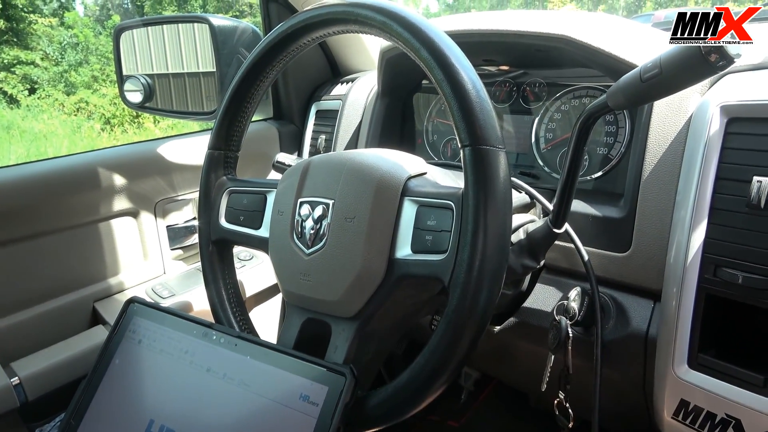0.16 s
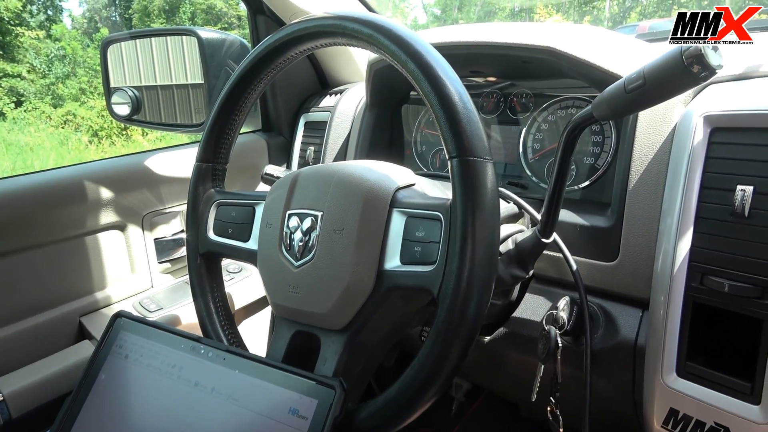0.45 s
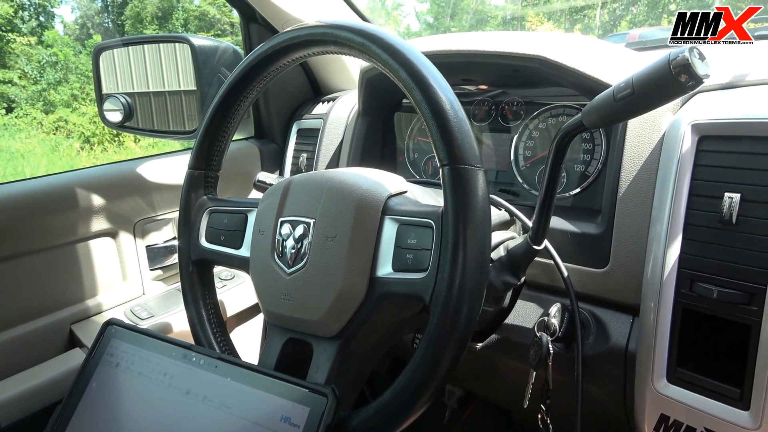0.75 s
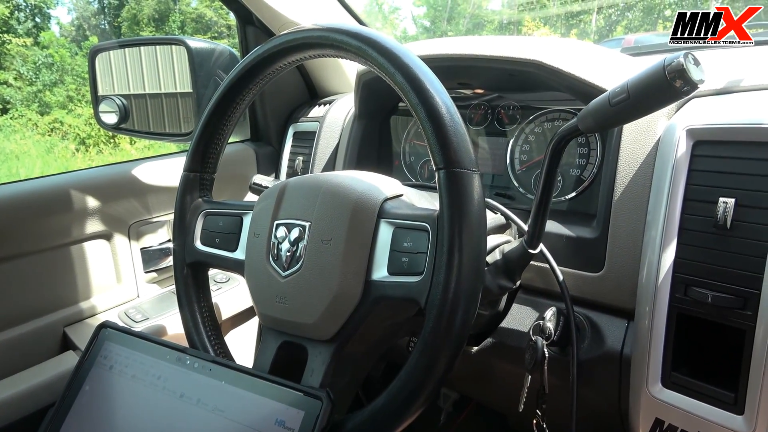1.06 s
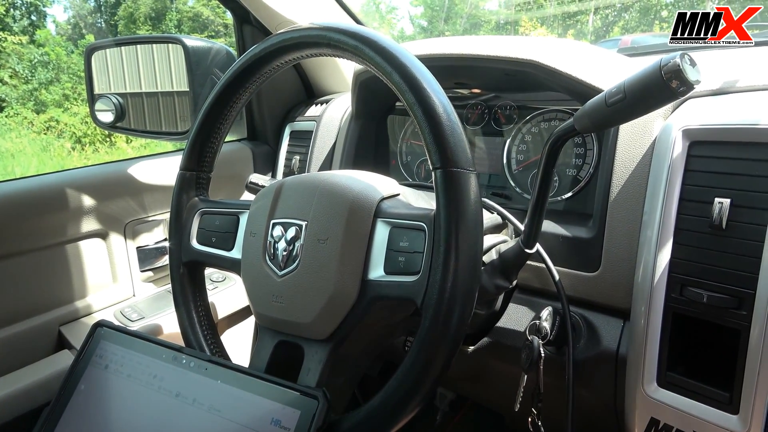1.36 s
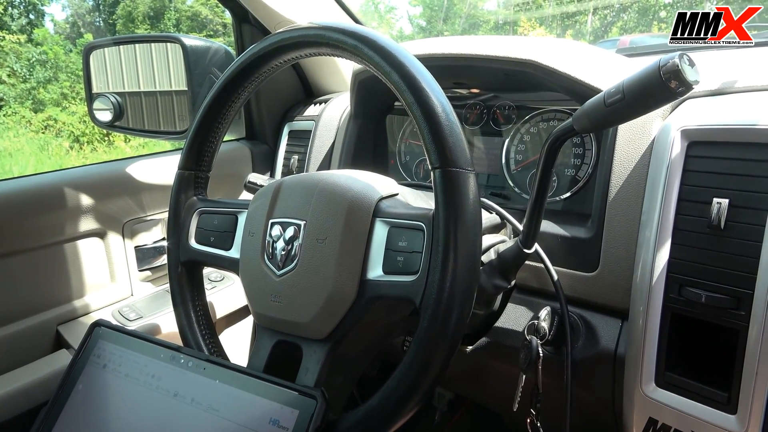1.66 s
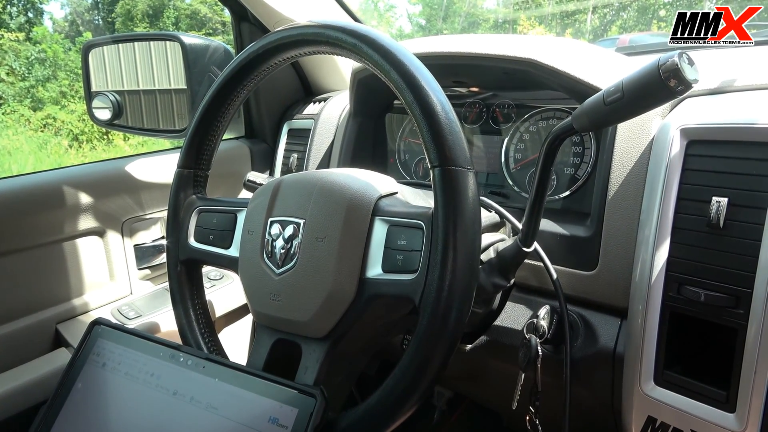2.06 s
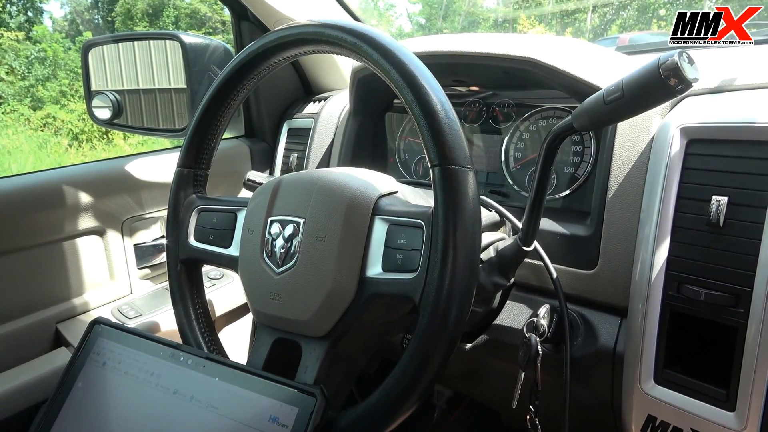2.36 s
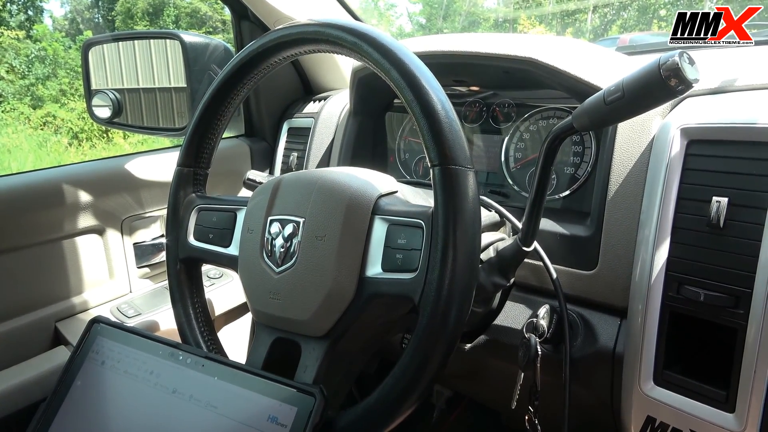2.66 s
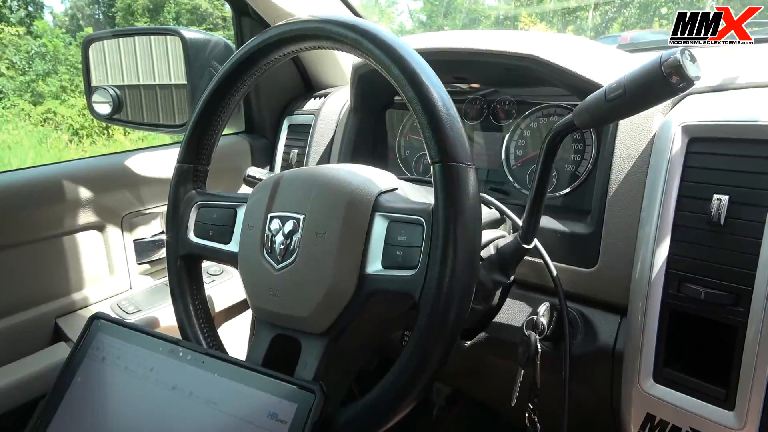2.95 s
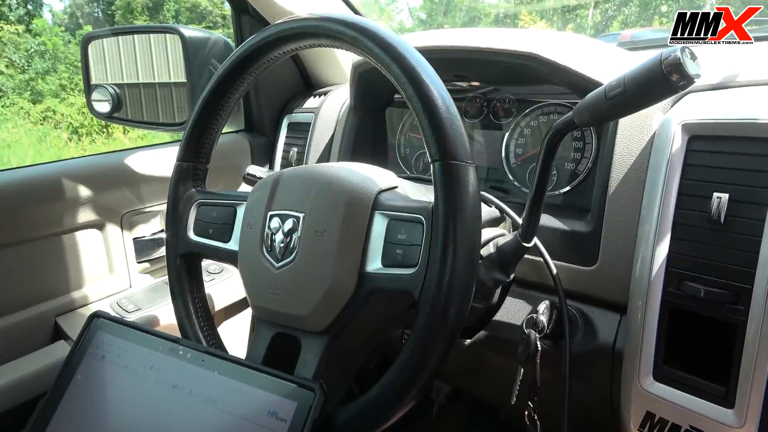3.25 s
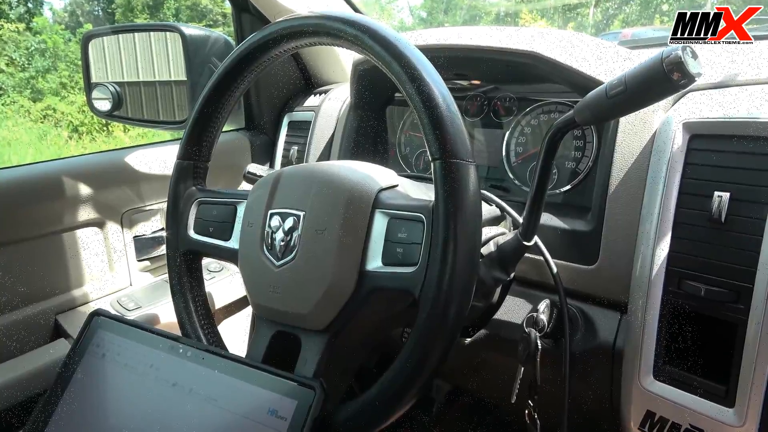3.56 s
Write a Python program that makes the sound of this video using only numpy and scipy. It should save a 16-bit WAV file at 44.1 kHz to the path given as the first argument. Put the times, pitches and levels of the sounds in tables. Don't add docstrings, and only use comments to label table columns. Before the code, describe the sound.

A large petrol engine idles fast and lumpy, booming and clattering inside a vehicle cabin.

```python
import sys
import numpy as np
from scipy import signal
from scipy.io import wavfile
from scipy.ndimage import uniform_filter1d

SR = 44100
rng = np.random.default_rng(int(sys.argv[2]) if len(sys.argv) > 2 else 0)


def elevation(decibels):
    levels = np.asarray(decibels, float)
    return 10 ** (levels / 20)


def store_pcm(level_fs):
    pcm = np.round(np.clip(level_fs, -1, 1) * 32767).astype(np.int16)
    wavfile.write(sys.argv[1], SR, np.atleast_2d(pcm).T)


N = 163170

# time_s, speed_rpm
CRANK_SPEED = [(0.0, 1144.7), (0.3, 1150.6), (0.55, 1123.2), (0.8, 1117.8), (1.3, 1118.2), (1.9, 1114.2),
               (2.3, 1106.6), (2.8, 1104.8), (3.2, 1094.5), (3.7, 1069.7)]
# multiple_of_cycle_rate, then rms level cold_db, easing_db, settling_db, warm_db
FIRING_ORDERS = [(1, -40, -41, -42, -38), (1.5, -38, -36, -35, -37), (2, -25, -26, -26.5, -32),
                 (3, -27, -25, -23.5, -22), (4.5, -43, -41, -40, -39), (5, -15, -14.5, -14.7, -16.5),
                 (7, -32, -29, -27, -21.5), (8, -16, -20.5, -25, -18), (8.5, -38, -37, -36, -38),
                 (9, -38, -34, -31.5, -29.5), (10, -46, -41, -36, -33), (11, -45, -44, -43, -42),
                 (14, -38, -42, -52, -55), (15, -43, -46, -48, -39), (16, -19, -24, -23.3, -21),
                 (17, -37, -34, -32.5, -30.5), (18, -45, -48, -43, -35), (22, -52, -49, -46, -47),
                 (29, -48, -47, -46, -46)]
# pitch_hz, sharpness_q
CABIN_BOOMS = [(29.3, 12), (77.2, 4.1)]
# up_to_hz, first_place_cycles, first_swell_db, second_place_cycles, second_swell_db
KNOCK_PLACES = [
    (400, .08, 5, .7, 4),
    (700, .12, 8, .55, 3),
    (820, .12, 5, .95, 3),
    (1050, .54, 3, .8, 3),
    (1200, .58, 7, .93, 6),
    (3200, .58, 4.5, .21, 2.5),
    (20000, .8, 3, .1, 1.5),
]
# time_s, level_db
ENGINE_LOAD = [(0.03, -32.5), (0.75, -33), (1.19, -32), (1.55, -31), (2.62, -30.5), (3.7, -29.5)]
# pitch_hz, density_db_per_hz
RUMBLE_COLOUR = [(4, -20), (9, -5), (25, -1), (62, -1), (85, -5), (112, -11), (170, -14), (200, -23),
                 (300, -40)]
ROAR_COLOUR = [(150, -38), (210, 1), (350, 1.5), (520, -6), (690, -10), (800, -3.5), (1050, -8.5),
               (1400, -15), (1700, -16)]
CLATTER_COLOUR = [(1200, -10), (1450, -8.5), (1800, 0.5), (2300, -2.5), (2950, -1.5), (3200, -4),
                  (4100, -7.5), (4600, -19)]
HISS_COLOUR = [(3900, -11.5), (4500, -2), (5600, -1), (6600, -4.5), (9000, -6.5), (10500, -11.5),
               (12500, -15), (15600, -27.5), (16500, -40)]
# pitch_hz, width_hz, rms_db
PART_RINGS = [(269, 7.8, -51), (514.3, 33, -48), (601.3, 15, -48.5), (731, 15, -49.5), (750.7, 17.8, -43),
              (786.3, 24, -48.5), (867, 13, -50.5), (893, 16, -50), (1013, 17, -52), (1111, 14, -46.5),
              (1134.5, 15.7, -45), (1183, 33, -52.5), (1312, 13, -53),
              (1806, 175, -48), (1965, 22, -54.5), (2100, 21, -54.5), (2174, 10.5, -54.5),
                (2456, 21, -53), (3368, 17, -57.5), (2600, 43, -51), (4510, 110, -59), (5850, 65, -63),
                (8680, 200, -57)]
# start_s, peak_db, pitch_hz, length_s
BELT_CHIRPS = [(.15, -40, 7900, 0.036), (0.357, -38, 7880, 0.04), (.575, -37.5, 7890, 0.027),
               (1.43, -40, 7860, 0.046), (1.65, -39, 7820, 0.057), (1.866, -39, 7850, 0.037),
               (2.079, -37, 7940, 0.038), (2.965, -43, 7950, .035), (3.177, -34, 7830, 0.04),
               (3.402, -32, 7770, .032), (3.628, -36, 7700, 0.027), (0.1, -44, 4630, 0.036),
               (0.316, -45, 4600, .04), (0.51, -40, 4600, 0.049), (1.405, -40.5, 4700, 0.03),
               (1.601, -41, 4640, 0.034), (2.01, -37, 4500, 0.022), (2.038, -34, 4430, 0.023),
               (2.028, -38, 5540, .03), (2.14, -44, 1850, .04), (2.022, -40, 5160, 0.042),
               (2.052, -34, 4560, 0.036), (3.127, -39, 4600, 0.064), (3.359, -37, 4680, 0.043),
               (3.572, -39.5, 4700, 0.035), (2.066, -37.5, 1895, 0.072), (2.578, -37, 2896, 0.028),
               (2.691, -35.5, 2860, 0.032), (3.159, -33, 2890, 0.042), (3.367, -37, 2890, 0.07),
               (3.455, -35, 2900, 0.026), (1.895, -38, 1545, 0.033), (2.9, -38, 5200, 0.038)]
# multiple_of_cycle_rate, rms_db, cut_in_s, cut_out_s
PUMP_ORDERS = [
    (14, -33.5, 2.12, 3.5),
    (37, -37.5, 2.13, 3.1),
]
# time_s, rms_db
SHUDDER_BOUTS = [
    (0, -40.5),
    (2.4, -36.5),
    (2.6, -29.5),
    (2.95, -37),
    (3.25, -29),
    (3.7, -31),
]
# start_s, level_db
SNAP_SLIPS = [
    (1.8201, -8),
    (1.8222, -11),
    (1.8234, -6),
    (1.8254, -11),
    (1.8279, -12),
    (1.8312, -13),
    (1.8342, -15),
    (1.8360, -18),
    (1.843, -22),
]
# pitch_hz, level_db, t60_s
SNAP_MODES = [(4600, -11, .04), (5050, -5, .022), (5630, 0, .01), (6100, -4, .008), (6600, -4, .007),
              (7300, -8, .006), (8100, -8, .006), (9200, -7, .006), (10300, -5, .006), (11400, -6, .006),
              (12500, -7, .005), (13700, -9, .005), (14900, -12, .005)]


def exhaust(turns):
    ease_s, settle_s, end_s = .6, 1.2, N / SR
    cold_lag_rad, intake_lead_rad = .4, 1.15
    chill = curve([(0, 1.5), (settle_s, .3), (end_s, -.3)])
    out = np.zeros(N)
    for k, *levels_db in FIRING_ORDERS:
        level_db = curve(list(zip((0, ease_s, settle_s, end_s), levels_db)))
        lag_rad = 0
        if k in (5, 7, 9, 17):
            lag_rad = cold_lag_rad * chill * (2 if k == 17 else 1)
        if k in (10, 11, 17):
            lag_rad = lag_rad - intake_lead_rad
        out += order(turns, k, level_db, lag_rad)
    return out


def engine_bay(turns):
    slow, quick = valves(turns, 2, .85), valves(turns, 4, .22)
    lap = np.cos(np.pi * turns - 4.6)
    roar = elevation(-34) * noise(ROAR_COLOUR, .25, size=1024)
    roar = roar * knocked(turns, 500, .25) * quick ** .2
    clatter = elevation(-40 + .15 * lap) * noise(CLATTER_COLOUR, 1.38, size=512)
    clatter = clatter * knocked(turns, 2000, .53) * slow ** .13
    hiss = elevation(-37.5 + .35 * lap) * noise(HISS_COLOUR, 1.2, size=256)
    hiss = hiss * knocked(turns, 6000, .64) * quick ** .092
    lump_db = 2.2
    rumble = elevation(-28 + lump_db * drift(9.7)) * noise(RUMBLE_COLOUR, 1.5, size=8192)
    load_db = curve(ENGINE_LOAD)
    moving = panels(turns) + flutter(turns, quick) + roar + clatter + hiss
    return elevation(load_db - load_db.mean()) * moving + rumble


def panels(turns):
    wander_db = 1
    out = np.zeros(N)
    for hz, width_hz, db in PART_RINGS:
        level = elevation(db + wander_db * drift(7))
        out += level * knocked(turns, hz, .8) * rung(1, hz, 1.37 * width_hz)
    return out


def flutter(turns, quick):
    hz, width_hz, start_db, rise_db = 2890, 96, -54.5, 8.5
    level = elevation(start_db + rise_db * np.arange(N) / N)
    return level * knocked(turns, hz, 1.36) * rung(quick ** .7, hz, width_hz)


def valves(turns, per_cycle, shift):
    fall_s, spread_db, bed = .028, .5, 1
    beat = np.floor(per_cycle * turns + shift).astype(int)
    strength = elevation(spread_db * rng.standard_normal(400))[beat % 400]
    hits = np.diff(beat, prepend=beat[0]) * strength
    fall = np.exp(-1 / (fall_s * SR))
    return evened(bed + signal.lfilter([1], [1, -fall], hits))


def knocked(turns, hz, share):
    span, uneven = .07, .25
    row = next(row for row in KNOCK_PLACES if hz < row[0])
    _, first, first_db, second, second_db = row
    luck = 1 + uneven * rng.standard_normal((60, 2))
    swell_db = np.zeros(N)
    for k, (place, db) in enumerate([(first, first_db), (second, second_db)]):
        cycle = (turns - place + 1.5).astype(int)
        away = (turns - place + .5) % 1 - .5
        swell_db += db * luck[cycle, k] * np.exp(-.5 * (away / span) ** 2)
    return evened(elevation(share * swell_db))


def belt():
    out = np.zeros(N)
    for start_s, db, hz, length_s in BELT_CHIRPS:
        width_hz = .049 * hz
        rub = rng.standard_normal(4000)
        rub = evened(resonate(resonate(rub, hz, width_hz), hz, width_hz))
        swell = np.sin(np.pi * np.minimum(np.arange(4000) / (length_s * SR), 1))
        add(out, start_s, elevation(db) * rub * swell)
    return out


def pump(turns):
    ramp_s, lag_rad = .14, 1.3
    t = np.arange(N) / SR
    out = elevation(curve(SHUDDER_BOUTS)) * rung(1, 173, 16)
    for k, db, on_s, off_s in PUMP_ORDERS:
        engaged = np.clip(np.minimum(t - on_s, off_s - t) / ramp_s + .5, 0, 1)
        out += engaged * order(turns, k, db, lag_rad)
    return out


def snap():
    level_db, rise_s = -6.5, .0002
    dulling_db = 420
    scrape_db, scrape_t60_s = -6, .006
    highpass = signal.butter(4, 8000, "high", fs=SR, output="sos")
    out, t = np.zeros(N), np.arange(2000) / SR
    for start_s, db in SNAP_SLIPS:
        dull_db = dulling_db * (start_s - SNAP_SLIPS[0][0])
        scrape = signal.sosfilt(highpass, rng.standard_normal(len(t)))
        hit = elevation(scrape_db - 60 * t / scrape_t60_s - dull_db) * scrape
        detune = rng.uniform(1.0, 1.04, len(SNAP_MODES))
        for h, (hz, mode_db, t60_s) in zip(detune, SNAP_MODES):
            octaves = np.log2(hz / SNAP_MODES[0][0])
            fade = elevation(mode_db - 60 * t / t60_s - dull_db * octaves)
            hit += fade * np.sin(2 * np.pi * hz * h * t)
        add(out, start_s, elevation(db + level_db) * hit * np.minimum(t / rise_s, 1))
    return out


def whine():
    hz, rms_db = 11639, -68
    level = np.sqrt(2) * elevation(rms_db + 2 * drift(3.6))
    return level * np.sin(2 * np.pi * hz * np.arange(N) / SR)


def order(turns, k, db, lag_rad=0):
    lead_rad, lead_per_order, wobble_db, wobble_rad = .28, .377, .9, .12
    hz = k * CRANK_SPEED[4][1] / 120
    boom_rad = sum(np.angle(1 - (hz / f) ** 2 + 1j * hz / f / q) for f, q in CABIN_BOOMS)
    phase = lead_rad + lead_per_order * k - lag_rad - boom_rad + wobble_rad * drift(6)
    level = np.sqrt(2) * elevation(db + wobble_db * drift(4.5))
    return level * np.cos(2 * np.pi * k * turns + phase)


def rung(drive, hz, width_hz):
    steadiness = .5
    tone = rng.standard_normal(N)
    tone = evened(resonate(resonate(tone, hz, width_hz), hz, width_hz))
    power = abs(uniform_filter1d(tone ** 2, size=int(2 * SR / hz) + 40)) + .05
    return evened(drive * tone / power ** (steadiness / 2))


def resonate(x, hz, width_hz):
    return signal.lfilter(*signal.iirpeak(hz, hz / width_hz, SR), x)


def noise(colour, patchy_db, size):
    hop, hz = size // 4, np.fft.rfftfreq(size, 1 / SR)
    a, b, patches = rng.standard_normal((N // hop + 5, len(hz), 3)).T
    patches = uniform_filter1d(patches, size=5, axis=0)
    patches = evened(uniform_filter1d(patches, size=20, axis=1))
    f, db = np.transpose(colour)
    shape_db = np.interp(np.log(hz + 1), np.log(f + 1), db, -90, -90)
    z = (a + 1j * b) * elevation(shape_db[:, None] + patchy_db * patches)
    return evened(signal.istft(z, nperseg=size, noverlap=3 * hop)[1][:N])


def drift(top_hz):
    t = np.arange(0, N + 256, 256)
    rates_hz = np.geomspace(.3, top_hz, 12)
    waves = sum(np.sin(2 * np.pi * (f * t / SR + rng.random())) for f in rates_hz)
    return np.interp(np.arange(N), t, evened(waves))


def curve(points):
    s, value = np.transpose(points)
    return np.interp(np.arange(N) / SR, s, value)


def evened(x):
    return x / np.sqrt(np.mean(x ** 2) + 1e-20)


def add(mix, start_s, sound):
    part = mix[round(start_s * SR):][:len(sound)]
    part += sound[:len(part)]


def scene():
    turns = .0143 + np.cumsum(curve(CRANK_SPEED)) / 120 / SR
    mix = exhaust(turns) + engine_bay(turns) + belt() + pump(turns) + snap() + whine()
    return mix[None]


def roll_off(x):
    return signal.sosfilt(signal.butter(12, 15680, fs=SR, output="sos"), x)


def record(dry):
    lowpass = signal.firwin(511, 15680, window=("kaiser", 9), fs=SR)
    cut = signal.oaconvolve(dry, lowpass[None], "same")
    hz, _, z = signal.stft(cut, SR, nperseg=2048, noverlap=1024)
    near = uniform_filter1d(uniform_filter1d(abs(z), size=3, axis=1), size=3, axis=2)
    mean = uniform_filter1d(near, size=40, axis=1)
    gate_db = np.interp(hz, (9000, 12500, 15500), (-9, -2, -1), -90)
    kept = near > mean * elevation(gate_db)[:, None]
    mix = signal.istft(z * kept, SR, nperseg=2048, noverlap=1024)[1][:, :N]
    return roll_off(mix)


dry = scene()
out = record(dry)
store_pcm(out)
```